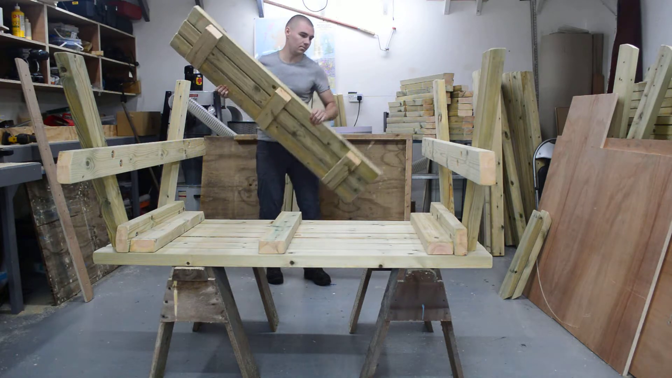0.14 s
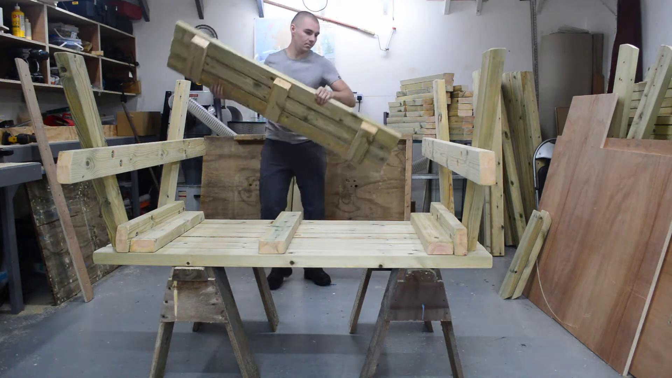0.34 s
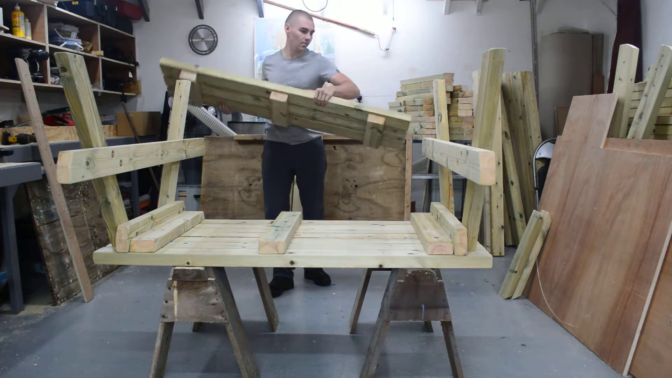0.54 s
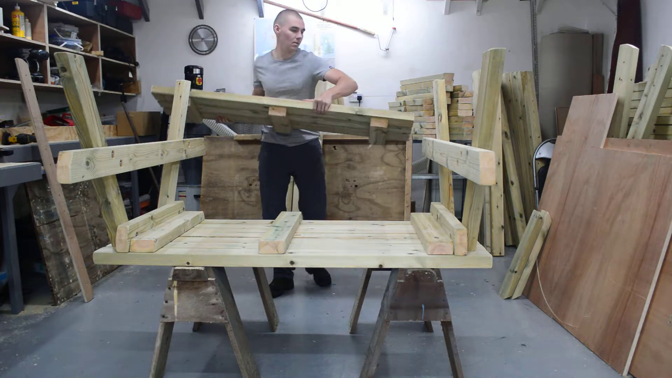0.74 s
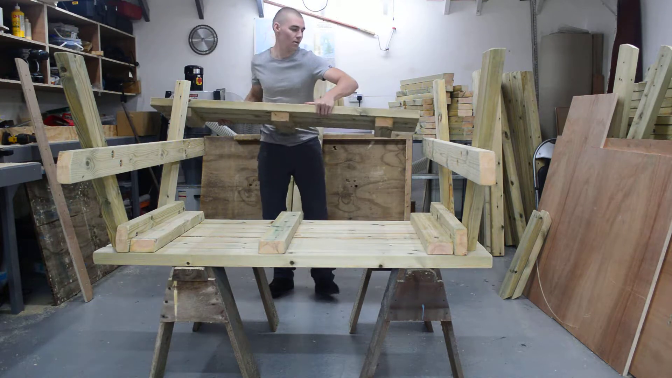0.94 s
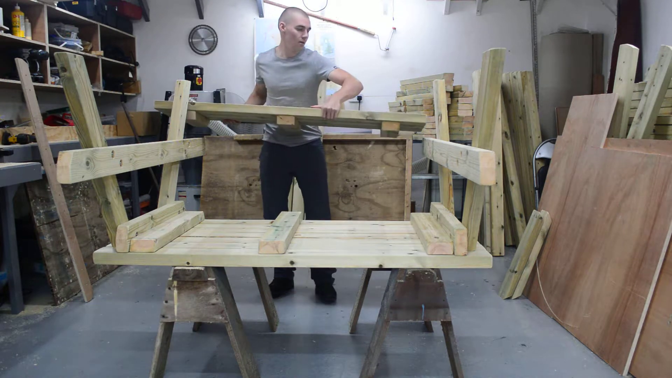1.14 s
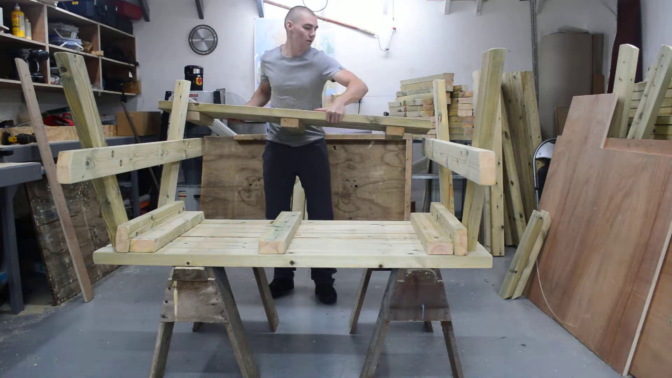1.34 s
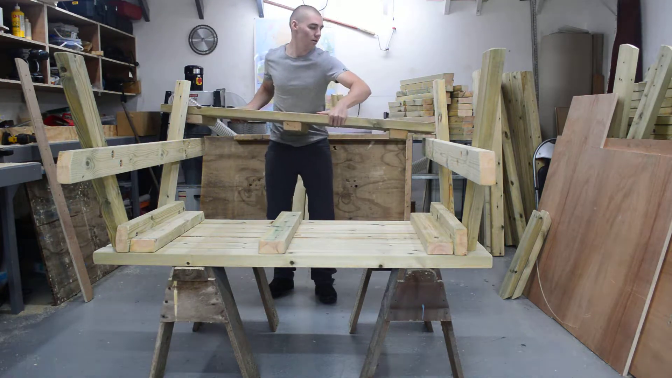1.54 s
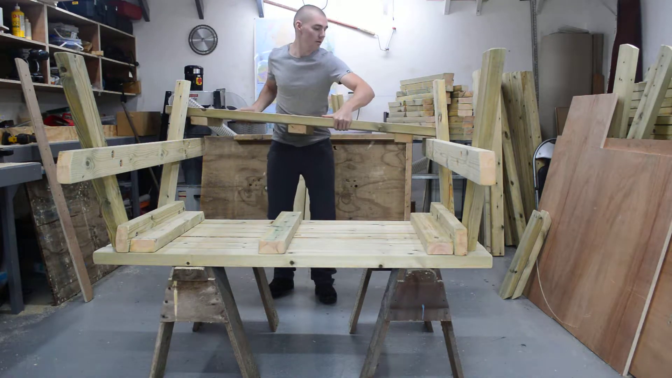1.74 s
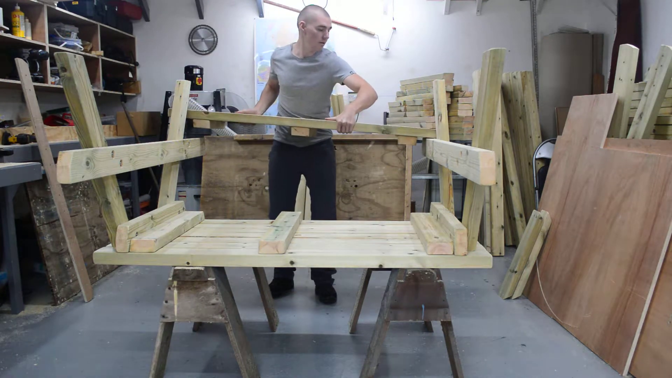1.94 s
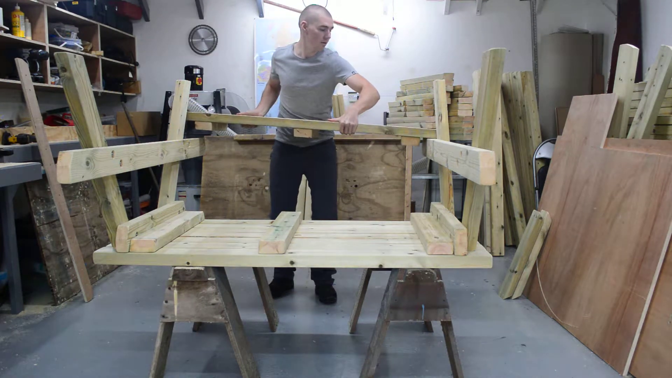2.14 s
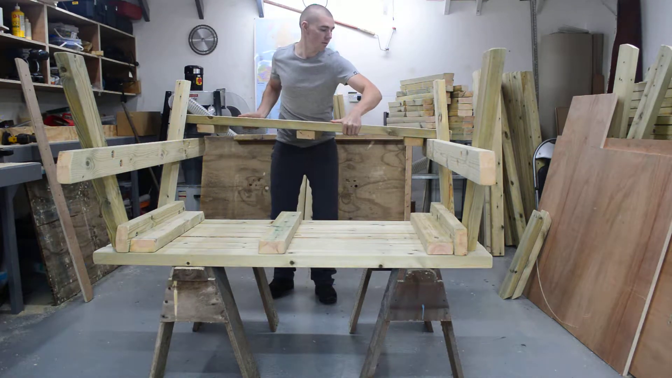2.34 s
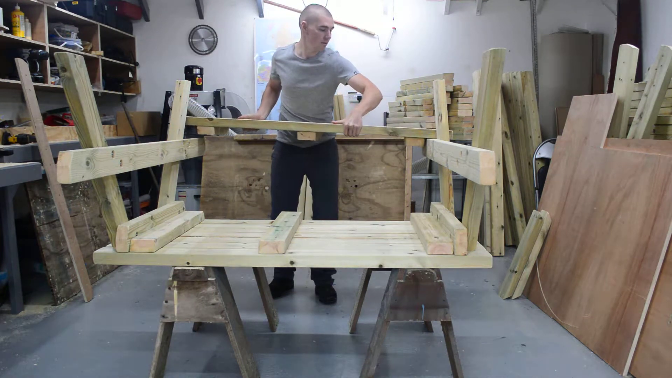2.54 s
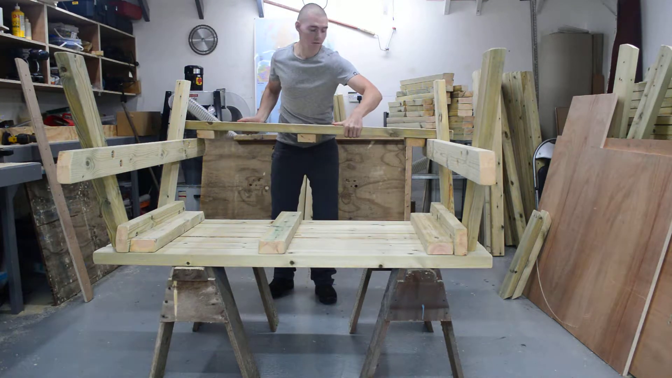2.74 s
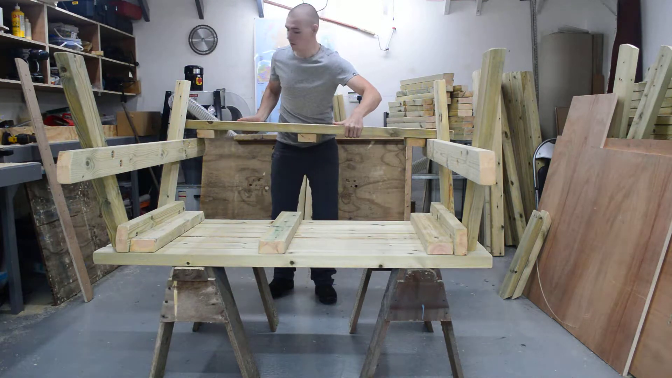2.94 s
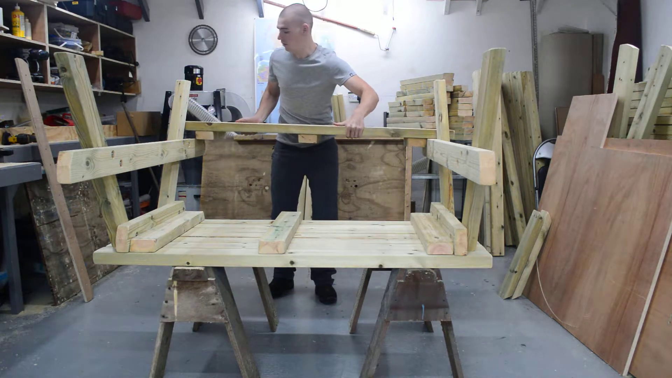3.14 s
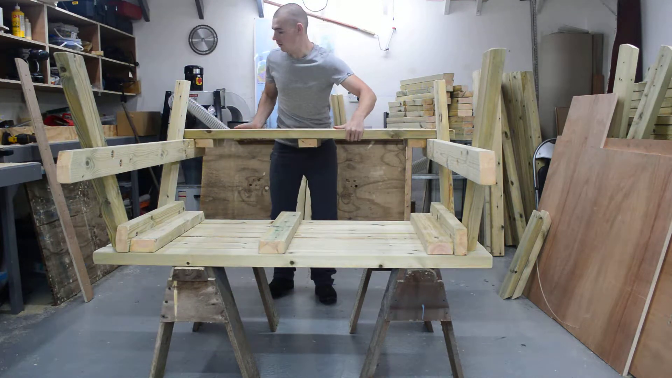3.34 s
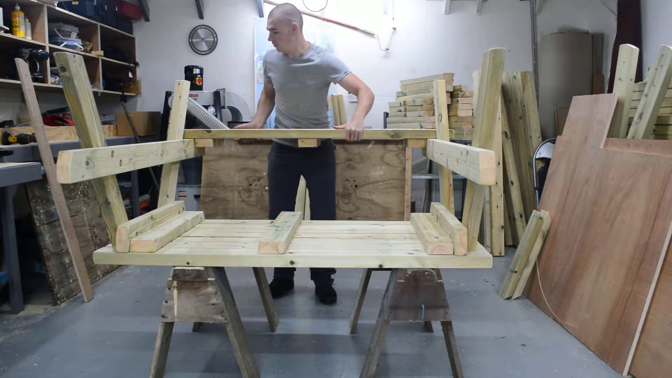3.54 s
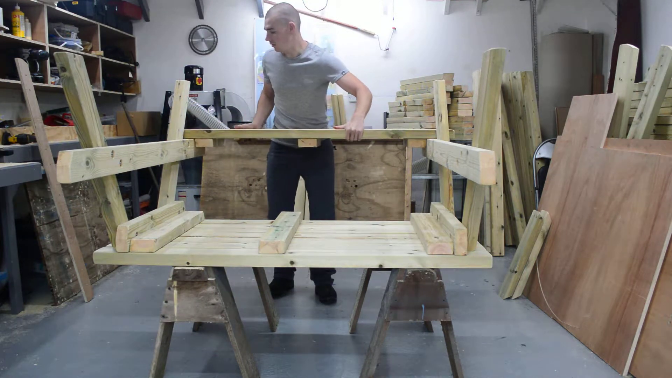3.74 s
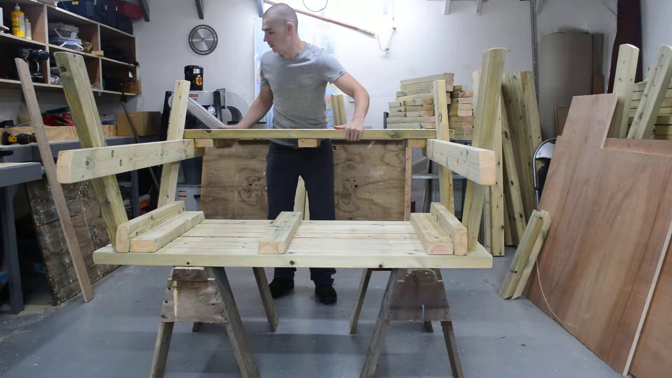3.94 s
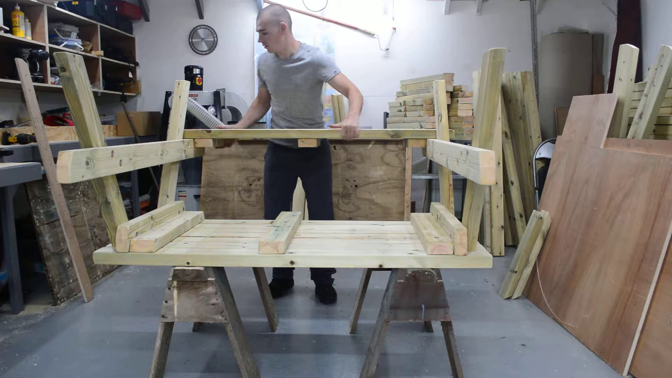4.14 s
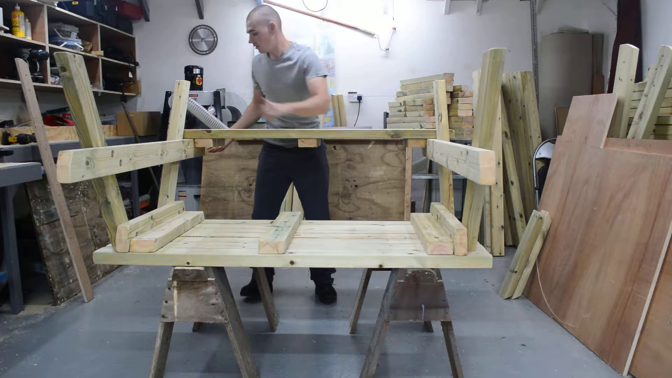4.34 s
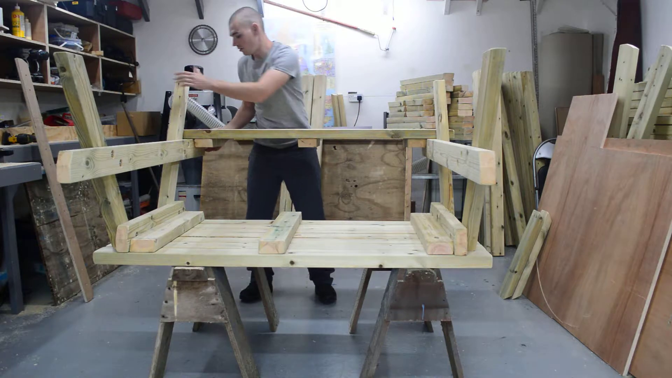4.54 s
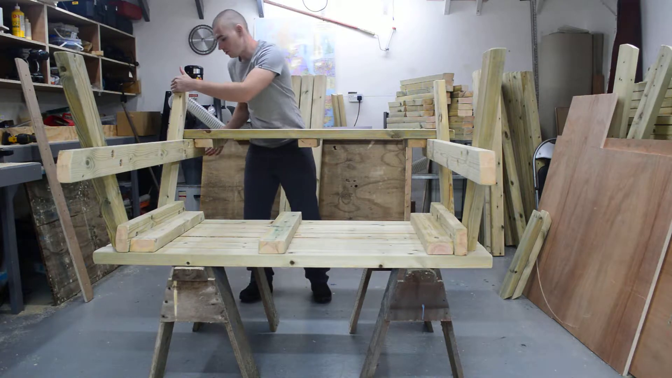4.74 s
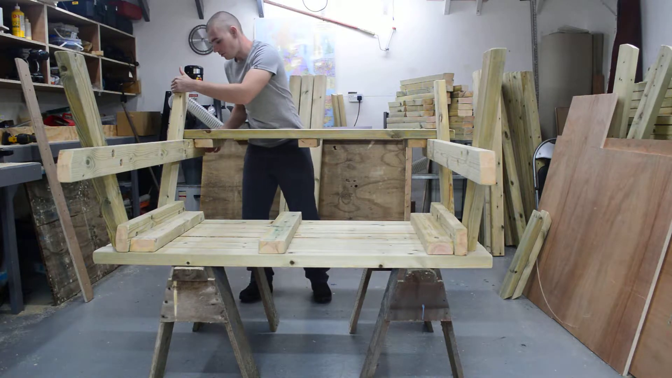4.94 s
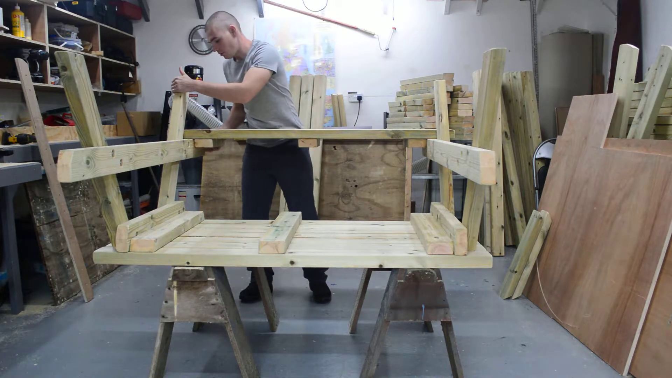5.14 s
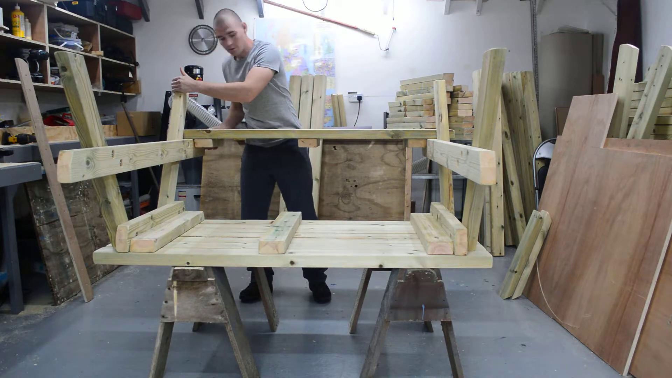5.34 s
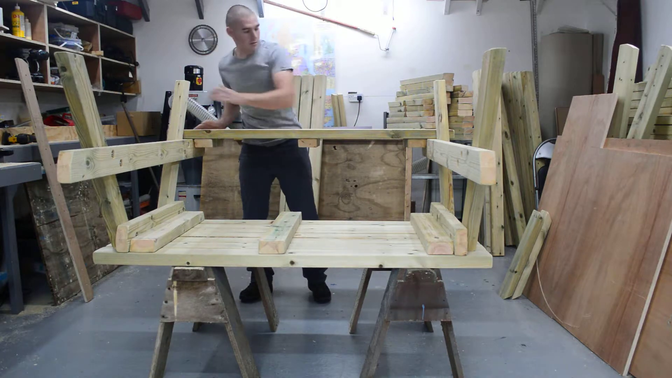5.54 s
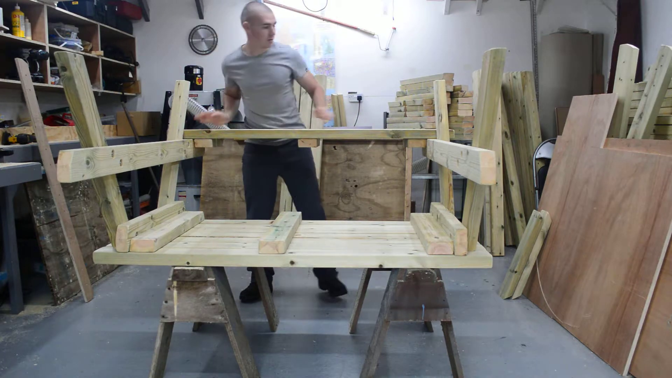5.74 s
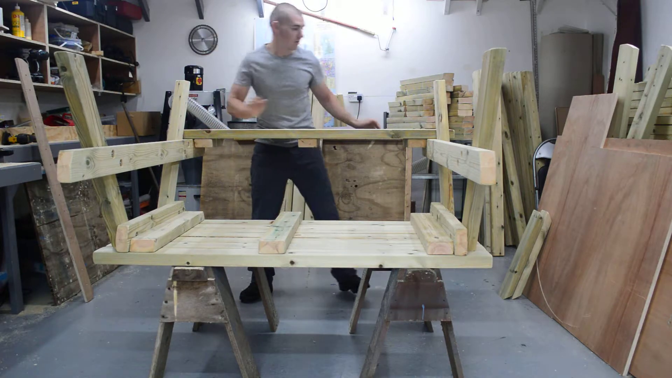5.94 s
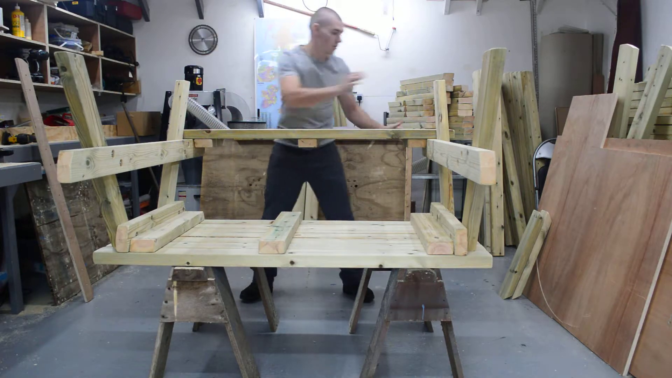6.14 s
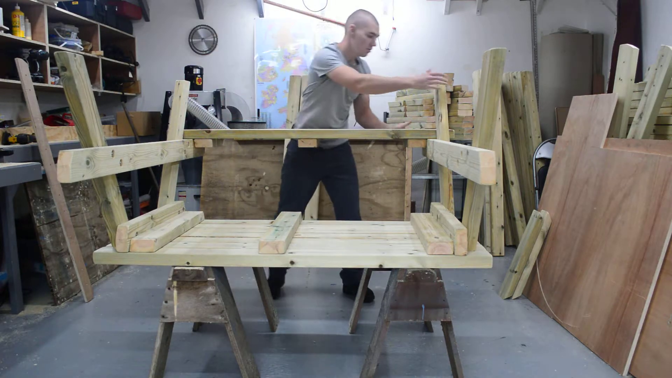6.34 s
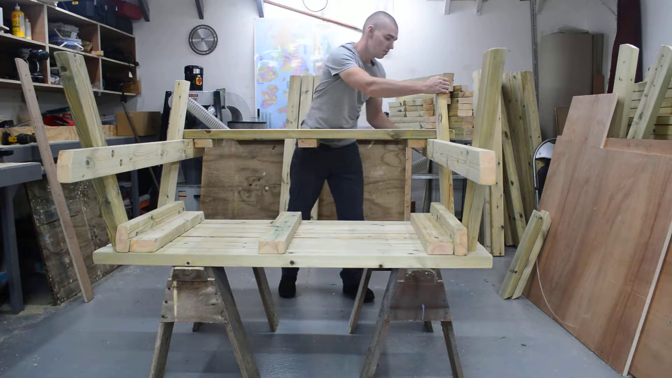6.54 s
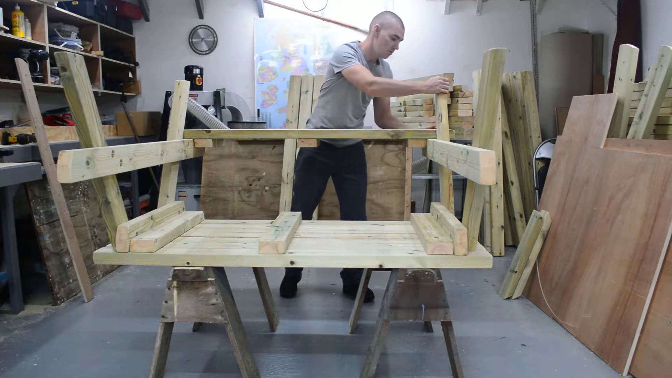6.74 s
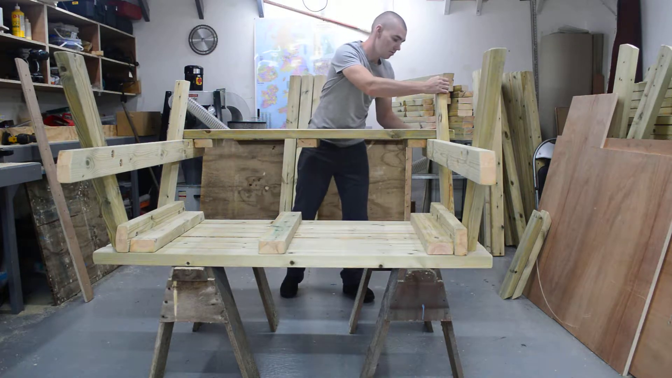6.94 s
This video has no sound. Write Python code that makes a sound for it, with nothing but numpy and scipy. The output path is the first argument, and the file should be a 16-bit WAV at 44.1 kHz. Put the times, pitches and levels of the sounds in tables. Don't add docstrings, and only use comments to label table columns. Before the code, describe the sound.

In a reverberant workshop, timber parts are fitted by hand: wood rubs, boards clack and bounce on the frame, and the frame and trestles answer with dull booms. Irregular clusters of knocks are separated by quiet shuffling. Some joints snap very dry and close, one loud enough to overload the microphone, while most impacts are carried by room echoes. Soft air noise and hum lie beneath.

```python
import sys
import numpy as np
from scipy import signal
from scipy.fft import rfft, irfft, next_fast_len
from scipy.io import wavfile
from scipy.ndimage import uniform_filter1d, map_coordinates

SR = 44100
rng = np.random.default_rng(int(sys.argv[2]) if len(sys.argv) > 2 else 0)


def ratio_of_db(decibels):
    return 10 ** (np.asarray(decibels, float) / 20)


def int16_out(signal):
    q = np.round(np.clip(np.atleast_2d(signal).T, -1, 1) * 32767)
    wavfile.write(sys.argv[1], SR, q.astype(np.int16))


N = 307377
TAIL = 32768
SPREAD_DB = 26.5


def unit(x):
    return x / np.sqrt(np.mean(np.abs(x) ** 2) + 1e-20)


def along(points, hz):
    f, v = np.transpose(points)
    return np.interp(np.log(hz + 1), np.log(f + 1), v)


def coloured(spectrum):
    m = next_fast_len(N + 8192)
    gain = ratio_of_db(along(spectrum, np.fft.rfftfreq(m, 1 / SR)))
    noise = irfft(rfft(rng.standard_normal(m)) * gain, m)
    return unit(noise[:N])


def wobble(rate):
    knots = rng.standard_normal(int(N * rate / SR) + 4)
    return map_coordinates(knots, [np.arange(N) * rate / SR])


def modes(table, f):
    total = 0
    for k, (hz, width, db) in enumerate(table):
        total = total + (-1) ** k * ratio_of_db(db) * 1j * f * width / (hz * hz - f * f + 1j * f * width)
    return total


def causal(power):
    cepstrum = irfft(np.log(power + 1e-14) / 2)
    half = len(cepstrum) // 2
    cepstrum[1:half] *= 2
    cepstrum[half + 1:] = 0
    return np.exp(rfft(cepstrum))


def share(db, response):
    return np.abs(ratio_of_db(db + SPREAD_DB) * unit(response)) ** 2


def shop(direct_db, build_s):
    # frequency in Hz, time to fall 60 dB in seconds
    reverb = [(60, 0.27), (150, 0.4), (400, 0.43), (1000, 0.41), (3000, 0.4), (8000, 0.32), (14000, 0.27)]
    hz, t, z = signal.stft(rng.standard_normal(TAIL), SR, nperseg=256)
    fall_db = -60 * t / along(reverb, hz)[:, None]
    fade = ratio_of_db(fall_db) + ratio_of_db(-33 + fall_db)
    tail = signal.istft(z * fade, SR, nperseg=256)[1][:TAIL]
    age = np.arange(TAIL) / SR
    walls = unit(uniform_filter1d(rng.standard_normal(TAIL), size=40))
    tail *= ratio_of_db(3.8 * walls * np.exp(-age / 0.023))
    tail *= 1 - np.exp(-age / build_s)
    tail *= np.clip(4 - 5 * age * SR / TAIL, 0, 1)
    tail /= np.linalg.norm(tail)
    tail[0] = ratio_of_db(direct_db)
    return rfft(tail)


def add(out, s, spectrum):
    out[round(s * SR):][:TAIL] += irfft(spectrum, TAIL)


def strokes(rows, grip_s, sag_db, stop_db):
    lead = 4410
    out, age = np.zeros((len(rows[0]) - 2, lead + N + SR)), np.arange(SR) / SR
    for s, hold, *levels in rows:
        fall_db = sag_db * age + stop_db * np.clip(age - hold, 0, 1)
        shape = np.clip(age / grip_s, 0, 1) * ratio_of_db(-fall_db)
        out[:, lead + round(s * SR):][:, :SR] += np.outer(ratio_of_db(levels), shape)
    return out[:, lead:lead + N]


def patchy(x, patchy_db):
    z = signal.stft(x, nperseg=256)[2]
    field = uniform_filter1d(rng.standard_normal(z.shape), size=7, axis=0)
    field = uniform_filter1d(field, size=9, axis=1)
    return unit(signal.istft(z * ratio_of_db(patchy_db * unit(field)), nperseg=256)[1][:N])


def room_tone():
    # start in seconds, rise of air in dB, rise of hum in dB
    stirs = [
        (0.0, 5, -7),
        (2.2, 3.5, 15),
        (2.74, 0, 10),
        (3.35, 1.5, 5),
        (4.79, 3, 2),
        (6.7, -1.5, 6),
    ]
    # frequency in Hz, level in dB per Hz
    air = [(18, -6), (40, -7.5), (100, -4.5), (200, -0.5), (400, -5), (630, -3.5), (1000, -5.5),
           (2000, -12.5), (4000, -18), (8000, -22), (16500, -34)]
    # frequency in Hz, level in dB per Hz
    hiss = [(500, -120), (1500, 3), (4000, -3), (8000, -7), (10000, -3.5), (13000, -8), (16500, -7)]
    s, air_db, hum_db = np.transpose(stirs)
    age = np.arange(N) / SR - s[:, None]
    onset = np.clip(age / 0.02, 0, 1)
    air_rise = air_db @ (onset * np.exp(-np.abs(age) / 0.68))
    hum_rise = hum_db @ (onset * np.exp(-np.abs(age) / 0.18))
    air_level = ratio_of_db(-50.5 + air_rise + 0.62 * wobble(4.36))
    hum_level = ratio_of_db(-55 + hum_rise + 1.5 * wobble(2.81))
    hum = coloured([(35, -120), (48, -6), (62, 3.0), (76, -2.5), (90, -12), (120, -120)])
    return air_level * coloured(air) + hum_level * hum + ratio_of_db(-60) * coloured(hiss)


def steel():
    # start in seconds, hold in seconds, low modes in dB, high modes in dB
    bouts = [
        (0.008, 0.096, -42, -45),
        (.11, 0.14, -43.5, -49),
        (0.3, 0.06, -50, -55),
        (.39, .085, -50, -55),
        (0.47, .12, -62, -62),
    ]
    # frequency in Hz, level in dB
    groups = [
        [(1635, 0), (1580, -8), (1360, -8), (1900, -13)],
        [(3210, -3), (3320, -6), (3480, -5), (3600, -9), (2850, -9)],
    ]
    # time in seconds, pitch ratio
    bend = [(0, 1), (.1, 1.0), (.13, 1.03), (.17, .99), (.26, .995), (.36, 1), (.44, .975), (.48, .95)]
    # start in seconds, frequency in Hz, level in dB, time to fall 60 dB in seconds
    one_ping = (3.785, 3200, -53, .45)
    # start in seconds, hold in seconds, frequency in Hz, level in dB, wander in Hz
    far_tone = (3.64, .68, 320, -52.5, 1.5)
    t = np.arange(N) / SR
    bent = np.cumsum(np.interp(t, *np.transpose(bend))) / SR
    ring = np.zeros(N)
    for group, gain in zip(groups, strokes(bouts, grip_s=0.0018, sag_db=28, stop_db=400)):
        for hz, rel_db in group:
            flutter = ratio_of_db(rel_db - 1.5 + 2.5 * wobble(35))
            ring += gain * flutter * np.sin(2 * np.pi * hz * bent + 1.3 * wobble(130))
    s, hz, db, t60 = one_ping
    ping_level = (t > s) * ratio_of_db(db - 60 * np.abs(t - s) / t60)
    ping = ping_level * np.sin(2 * np.pi * hz * t + 1.2 * wobble(40))
    s, hold, hz, db, wander_hz = far_tone
    held = strokes([(s, hold, db)], grip_s=0.08, sag_db=0, stop_db=150)[0]
    pitch = hz + wander_hz * wobble(22)
    drone = held * ratio_of_db(1.2 * wobble(13)) * np.sin(2 * np.pi * np.cumsum(pitch) / SR)
    return ring + ping + drone


def rubbing():
    # start in seconds, hold in seconds, fine hiss in dB, coarse scrape in dB
    rubs = [(3.56, 0.23, -65, -53), (-0.03, 0.16, -51, -39), (0.14, 0.24, -52.5, -44.5),
            (0.47, .08, -56, -50), (0.58, 0.1, -56.5, -56), (0.96, 0.055, -56, -54), (1.19, .01, -70, -74),
            (1.858, .025, -58, -47), (1.93, .03, -58, -58), (3.24, 0.087, -49, -61),
            (3.315, 0.12, -49.5, -62), (3.43, 0.019, -46, -62), (4.1, 0.076, -52, -44.5),
            (4.19, 0.023, -60, -55), (4.34, 0.16, -54.5, -53), (4.6, 0.11, -54.5, -56),
            (4.697, 0.025, -62, -52), (5.325, 0.12, -46.5, -48.5), (5.445, 0.026, -52, -53),
            (5.53, 0.16, -60, -58), (5.665, 0.068, -47.5, -49), (5.86, 0.19, -65, -55.5),
            (6.05, 0.13, -50.5, -46), (6.19, 0.16, -56, -53.5), (6.37, 0.071, -55.5, -49),
            (6.43, 0.049, -56.5, -58), (6.54, .05, -68, -69)]
    # frequency in Hz, level in dB
    fine_colour = [(1500, -120), (3000, -8.5), (5500, -5.5), (7500, -6.5), (9500, -2.5), (11000, -8),
                   (13000, -19), (15500, -26), (17000, -120)]
    # frequency in Hz, level in dB
    scrape_colour = [(200, -120), (500, -14), (1500, 0), (3500, -6), (6000, -13), (10000, -29),
                     (14000, -120)]
    fine, coarse = strokes(rubs, grip_s=0.025, sag_db=17.5, stop_db=158)
    slips = ratio_of_db(0.23 * wobble(69) + 0.87 * wobble(500))
    hissing = patchy(slips * coloured(fine_colour), patchy_db=3)
    scraping = patchy(slips * coloured(scrape_colour), patchy_db=3)
    return fine * hissing + coarse * ratio_of_db(-5) * scraping


def chinks():
    # start in seconds, frequency in Hz, width in Hz, level in dB
    contacts = [(.142, 4100, 500, -43), (.24, 503, 120, -49), (.305, 1950, 400, -52), (.423, 620, 150, -54),
                (.446, 215, 60, -53), (2.139, 2500, 700, -28), (2.177, 1450, 400, -27),
                (3.30, 10300, 1500, -46), (3.325, 9800, 1504, -40), (3.348, 3180, 900, -26.5),
                (3.772, 4500, 5000, -46), (5.153, 1500, 1200, -39), (5.153, 5040, 1500, -34),
                (3.35, 1940, 450, -29), (3.40, 2030, 400, -37), (4.67, 600, 80.2, -51),
                (4.92, 520, 150, -35.5), (5.19, 570, 121, -39), (5.447, 4400, 600, -49),
                (5.452, 9500, 2500, -50), (5.69, 5170, 900, -50), (5.70, 2250, 300, -51),
                (6.066, 2300, 900, -49), (6.13, 330, 90, -55), (6.699, 2630, 300, -35),
                (6.70, 3300, 800, -31), (6.715, 1700, 600, -33), (6.755, 2000, 1200, -43)]
    out, f = np.zeros(N + TAIL), np.fft.rfftfreq(TAIL, 1 / SR)
    for s, hz, width_hz, db in contacts:
        cluster = modes([(hz, width_hz, 0)], f) ** 2
        add(out, s, causal(share(db, cluster)) * shop(direct_db=-13, build_s=0.0015))
    return out[:N]


def cracks():
    # start in seconds, peak in dB, pitch in Hz
    snaps = [(.148, -38, 8000), (.472, -47, 9000), (1.192, -46, 9500), (2.777, -33, 7500),
             (3.171, -33, 6300), (3.1908, -18.5, 9000), (3.1915, -27, 14000), (3.232, -30, 11500),
             (3.37, -33, 12000), (3.41, -33, 10500), (3.433, -35, 10500), (3.446, -33, 11500),
             (3.639, -50, 7000), (3.696, -46, 6000), (3.778, -35, 9500), (3.9558, -19, 6200),
             (3.956, -24, 11000), (4.198, -37, 10000), (4.476, -36, 5000), (4.478, -23, 3600),
             (4.478, -23, 9000), (4.483, -29, 5000), (4.703, -45, 8000), (4.7855, -20, 3600),
             (4.8245, 0, 9500), (4.8555, -23, 9500), (4.904, -30, 9000), (4.7775, -42, 9500),
             (4.8245, -12, 3000), (4.8295, -21, 3800), (5.1528, -18, 4200), (5.1702, -6, 9000),
             (5.355, -43, 8000), (6.059, -41, 9500), (6.066, -41, 9000), (6.093, -38, 10000),
             (6.135, -41, 11500), (6.177, -39, 10000), (6.665, -31, 3200), (6.6975, -27, 11500),
             (6.7665, -29, 11000)]
    out, f = np.zeros(N + TAIL), np.fft.rfftfreq(TAIL, 1 / SR)
    port = modes([(10300, 3000, 4.0), (2500, 6600, 4.0), (13500, 4000, -8)], f)
    age = np.arange(128) / SR
    burst = np.exp(-(age / 0.0006) ** 2 / 2)
    for s, db, hz in snaps:
        chatter = 0.33 * np.clip(db / -16, 0.55, 1) ** 2
        slips = chatter * rng.standard_normal(len(age)) * burst
        slips[0] = 1
        snap = unit(modes([(hz, hz, 0)], f) ** 2 * port) * rfft(slips, TAIL)
        add(out, s, ratio_of_db(db - 3) * snap * shop(direct_db=9, build_s=0.004))
    return out[:N]


def ringing():
    # start in seconds, frequency in Hz, level in dB, time to fall 60 dB in seconds
    rails = [(1.86, 192, -39, 0.45), (2.185, 153, -34, 0.9), (2.43, 177.7, -33, 0.37),
             (2.729, 152, -23.5, 0.22), (3.965, 149, -31, 0.11), (4.485, 160, -41, 0.43),
             (4.79, 155.6, -34, 0.38), (4.83, 164, -24, 0.17), (4.92, 191, -41, 0.32),
             (5.18, 187.5, -27.5, 0.34), (4.34, 185, -38, .2), (6.679, 135, -22, 0.13),
             (6.72, 175, -24, 0.14)]
    # start in
    # seconds, frequency in Hz, level in dB, time to fall 60 dB in seconds
    notes = [(1.838, 650, -46, 0.68), (2.153, 1440, -21.5, 0.24), (2.151, 1050, -30.5, 0.35),
             (2.158, 980, -33, 0.25), (2.426, 720, -37, 0.11), (3.349, 805, -18, 0.43),
             (3.36, 660, -26, 0.4), (3.347, 950, -17, 0.17), (3.347, 764, -23, .3), (3.347, 540, -39, 0.18),
             (3.346, 1065, -21.5, 0.33), (3.352, 1470, -22, 0.16), (3.345, 1770, -32, 0.23),
             (6.317, 880, -35, 0.11), (2.779, 1084, -36, 0.35), (2.778, 1570, -38, 0.27),
             (4.826, 1460, -36, 0.41), (4.826, 410, -23, 0.26), (5.172, 900, -36, 0.18),
             (6.715, 320, -34, 0.18), (1.835, 320, -36, 0.12), (1.861, 450, -46, 0.23),
             (2.133, 600, -30, .13), (2.43, 370, -35, .15), (2.72, 284, -25.5, 0.28),
             (3.347, 430, -26, 0.28), (3.37, 371, -23.5, 0.47), (3.347, 1220, -20, .17),
             (3.958, 313, -32, .12), (6.13, 250, -46, .1), (3.961, 2363, -43, 0.22), (4.34, 280, -42, .2),
             (4.483, 330, -35, .12), (4.5, 500, -39.5, .3), (4.482, 1637, -40, 0.2), (4.482, 2460, -35, .3),
             (4.845, 477, -31, .2), (4.91, 500, -34, .15), (4.98, 590, -35.5, 0.19), (5.18, 520, -34, .2),
             (6.32, 660, -42, 0.19), (6.705, 510, -30, 0.18), (6.70, 840, -33, 0.23),
             (6.70, 1380, -40, 0.23), (6.70, 2500, -29, 0.18)]
    # start in seconds,
    # frequency in Hz, level in dB, time to fall 60 dB in seconds
    short_notes = [(2.155, 1170, -23, .12), (2.152, 1620, -27, .12), (2.172, 1530, -24, .14),
                   (2.165, 930, -27, .17), (2.2, 1270, -30, .15), (2.26, 1480, -35, .15), (2.712, 320, -19, .1),
                   (2.728, 270, -24, .1), (2.75, 330, -25, .1), (3.347, 800, -7.5, .12), (3.378, 620, -20, .12),
                   (3.382, 900, -18, .15), (3.395, 1060, -22, .1), (3.405, 1790, -27, .1), (3.385, 2110, -32, .1),
                   (3.4, 810, -17, .16), (3.44, 1270, -26, .12), (3.445, 630, -24, .12), (3.475, 1320, -30, .12),
                   (3.495, 800, -28, .2), (3.38, 350, -16, .15), (6.123, 320, -32, .06), (6.15, 230, -40, .06),
                   (6.09, 2100, -45, .12), (6.722, 340, -24, .1), (6.718, 120, -20, .12), (6.735, 220, -27, .22),
                   (6.77, 380, -28, .1), (6.81, 400, -36, .1), (1.833, 230, -38, .12), (1.965, 240, -41, .15),
                   (2.15, 820, -29, .15), (2.165, 690, -33, .13), (2.205, 830, -39, .25), (2.228, 980, -29, .22),
                   (2.25, 820, -40, .2), (2.787, 1000, -26, .15), (2.82, 280, -31, .15), (3.346, 690, -17, .15),
                   (3.425, 690, -21, .22), (3.41, 980, -19, .15), (3.51, 680, -31, .2), (3.355, 150, -19, .15),
                   (4.82, 880, -26, .1), (4.875, 520, -24, .2), (4.878, 1460, -29, .1), (5.166, 370, -33, .15),
                   (6.68, 520, -28, .25), (6.69, 920, -29, .25), (6.685, 1400, -38, .2)]
    out, age = np.zeros(N + TAIL), np.arange(TAIL) / SR
    for s, hz, db, t60 in [*rails, *notes, *short_notes]:
        waver = map_coordinates(rng.standard_normal(32), [age * 22])
        fade = ratio_of_db(db + 0.5 - 60 * age / t60 + 4.5 * waver)
        swell = fade * (1 - np.exp(-age * hz / 2))
        out[round(s * SR):][:TAIL] += swell * np.sin(2 * np.pi * hz * age)
    return out[:N]


def thuds():
    # start in seconds, thud in dB, thud pitch in Hz, boom in dB
    blows = [(0.09, -44, 280, -60), (1.838, -32, 238, -39), (1.95, -44, 208, -54),
             (2.136, -26.5, 277, -30.5), (2.422, -31.5, 218, -46), (2.714, -22.5, 290, -35),
             (2.777, -33, 280, -29.5), (3.172, -21, 234, -33), (3.346, -15, 314, -25),
             (3.44, -29, 250, -32.5), (3.957, -34, 300, -70), (4.339, -41.5, 234, -59),
             (4.48, -30, 201, -47), (4.787, -19.5, 259, -43), (4.835, -21.5, 290, -29),
             (4.851, -27, 266, -44), (5.158, -35.5, 229, -39.5), (5.181, -30, 220.3, -34),
             (6.129, -44.5, 252, -70), (6.317, -37.5, 250, -52), (6.668, -22.5, 194, -26.5),
             (6.701, -23.5, 340, -41), (6.725, -42, 260, -38)]
    # frequency in Hz, width in Hz, level in dB
    frame_modes = [(150, 20.5, 5.5), (194, 19.5, 3.5), (290, 71, -1), (370, 37, 2.5), (472, 67, 0.5)]
    # frequency in Hz, width in Hz, level in dB
    trestle_modes = [(73, 10.4, -3), (99.4, 23, -2.5)]
    out, f = np.zeros(N + TAIL), np.fft.rfftfreq(TAIL, 1 / SR)
    frame = modes(frame_modes, f)
    trestle = modes(trestle_modes, f) * 150 / (150 + 1j * f)
    for s, thud_db, hz, boom_db in blows:
        spot = modes([(hz, 0.94 * hz, 0)], f)
        blow = share(thud_db, frame * spot) + share(boom_db, trestle)
        add(out, s, causal(blow) * shop(direct_db=-14.5, build_s=0.01))
    return out[:N]


def knocks():
    # start in seconds, board knock in dB, knock pitch in Hz, clack in dB, edge hiss in dB
    contacts = [(0.148, -44, 1210, -39.5, -37.5), (1.837, -40.5, 664, -51, -65),
                (2.138, -25, 1200, -30.5, -34.5), (2.152, -19, 1250, -29, -29), (2.424, -38, 754, -53, -55),
                (2.716, -39, 600, -53, -49), (2.735, -30.5, 760, -40, -65),
                (2.779, -24.5, 1250, -35.5, -40.5), (3.167, -28, 850, -36, -37),
                (3.19, -24, 1040, -29.5, -38.5), (3.3475, -9, 860, -29, -43), (3.36, -11.5, 860, -35, -49),
                (3.447, -39, 840, -34.5, -37), (3.956, -29, 1000, -28, -33.5),
                (4.479, -27.5, 900, -24, -30.5), (4.7855, -27.5, 1150, -28.5, -29),
                (4.825, -24.5, 1300, -25, -27), (4.85, -25, 790, -66, -68), (5.152, -35, 1080, -37, -30.5),
                (5.17, -28.5, 850, -33, -40), (6.316, -34.5, 696, -53, -60),
                (6.6655, -26, 1050, -29, -34.5), (6.698, -22.5, 1080, -23, -38.5)]
    # start in seconds, board knock in dB, clack in dB, edge hiss in dB
    bounces = [(0.556, -42.5, -44, -46.5), (0.645, -58, -52, -50), (0.967, -50, -67, -44.5),
               (1.949, -63, -51, -63), (2.132, -33, -48, -58), (2.36, -43.5, -47.5, -52),
               (3.777, -48, -43.5, -42), (4.198, -48.5, -49, -52), (4.342, -47, -53, -50),
               (4.999, -40, -47, -53), (5.321, -45, -46, -43.5), (6.066, -50, -47, -48),
               (6.74, -48, -54, -44)]
    # frequency in Hz, width in Hz, level in dB
    board_modes = [(423, 92, 1), (540, 44, 7.5), (591, 73, 6.5), (805, 153, 2), (914, 117, 1.5),
                   (1063, 69, 0), (1170, 150, -0.5), (1383, 112, 4), (1475, 105, 4.5), (1760, 250, 5),
                   (2004, 266, 5), (2600, 1050, -9)]
    # frequency in Hz, level in dB
    edge_colour = [(1000, -120), (2500, -8), (5000, 2.5), (7500, 1), (10000, 2), (11500, -7), (13000, -18),
                   (15500, -36), (17000, -120)]
    out, f = np.zeros(N + TAIL), np.fft.rfftfreq(TAIL, 1 / SR)
    board, edge = modes(board_modes, f), ratio_of_db(along(edge_colour, f))
    touches = [(s, db, 900, *rest) for s, db, *rest in bounces]
    for s, knock_db, knock_hz, clack_db, edge_db in [*contacts, *touches]:
        clack_hz = 2990 + 39 * min(edge_db - clack_db, 0)
        spot = modes([(knock_hz, 0.85 * knock_hz, 0)], f) ** 2
        clack = modes([(clack_hz, 0.96 * clack_hz, 0)], f) ** 2
        grain = ratio_of_db(1.5 * map_coordinates(rng.standard_normal(256), [f / 180]))
        blow = share(knock_db, board * spot)
        blow = blow + share(clack_db, clack * grain) + share(edge_db, edge * grain)
        add(out, s, causal(blow) * shop(direct_db=-15, build_s=0.0026))
    return out[:N]


def scene():
    background = room_tone() + steel() + rubbing()
    contacts = chinks() + cracks() + ringing() + thuds() + knocks()
    return (background + contacts)[None]


def roll_off(x):
    return signal.sosfilt(signal.butter(12, 15750, fs=SR, output="sos"), x)


def record(dry):
    mix = np.clip(dry, -1, 1)
    return roll_off(mix)


dry = scene()
out = record(dry)
int16_out(out)
```